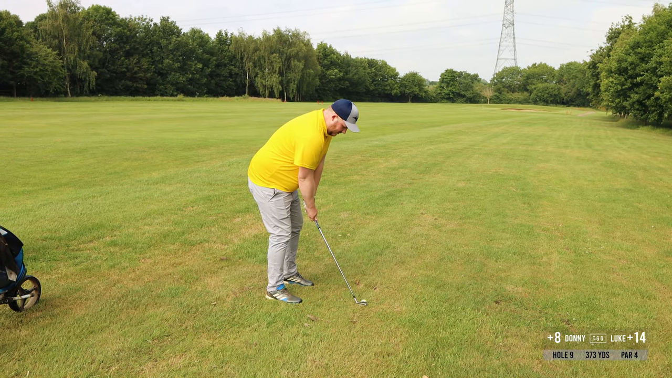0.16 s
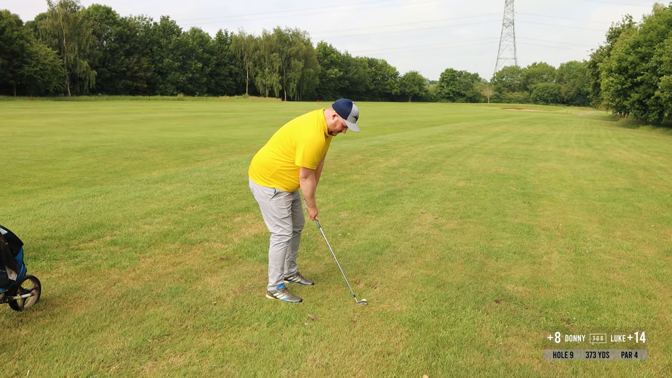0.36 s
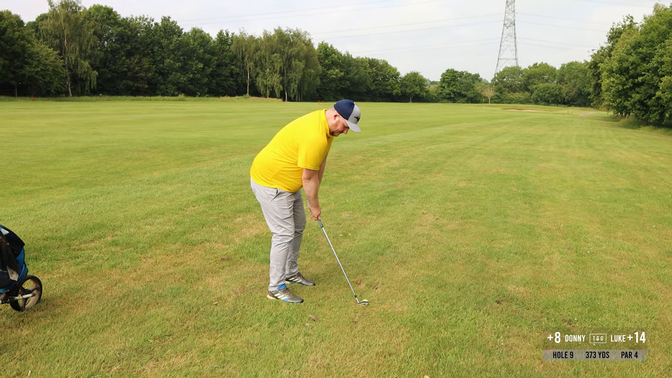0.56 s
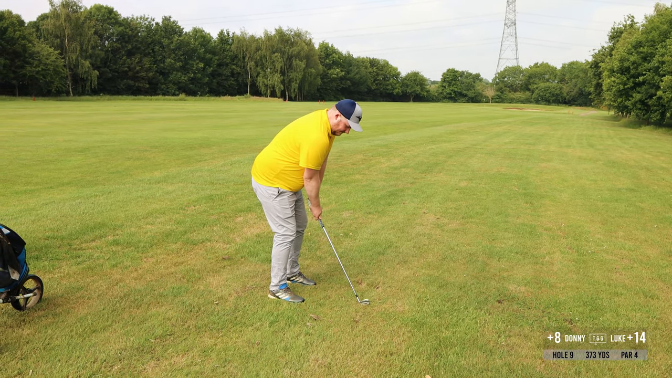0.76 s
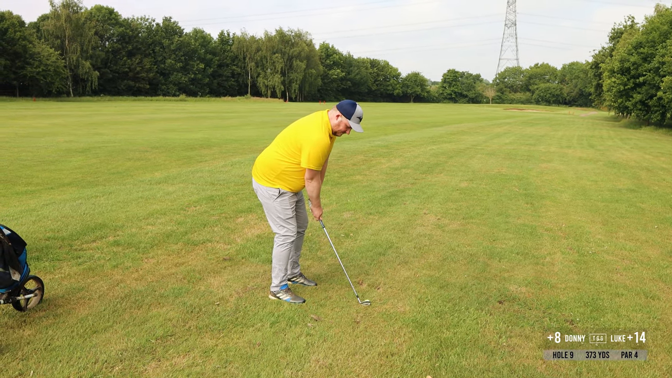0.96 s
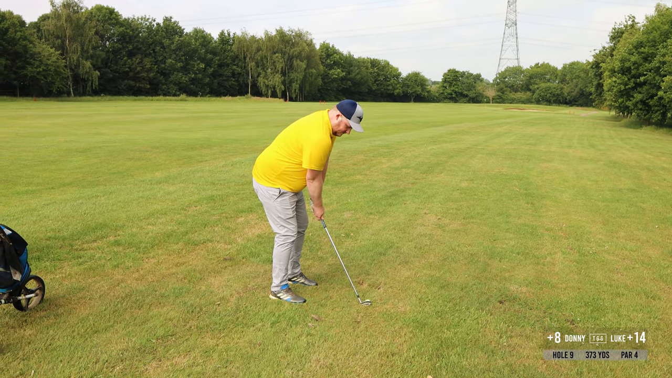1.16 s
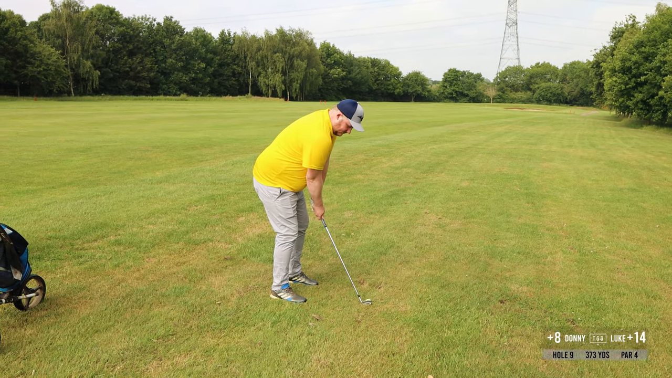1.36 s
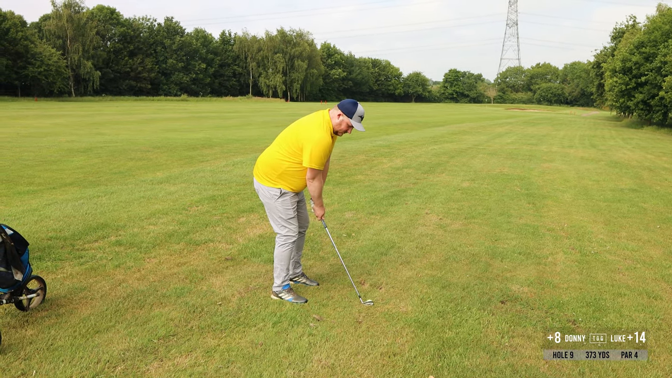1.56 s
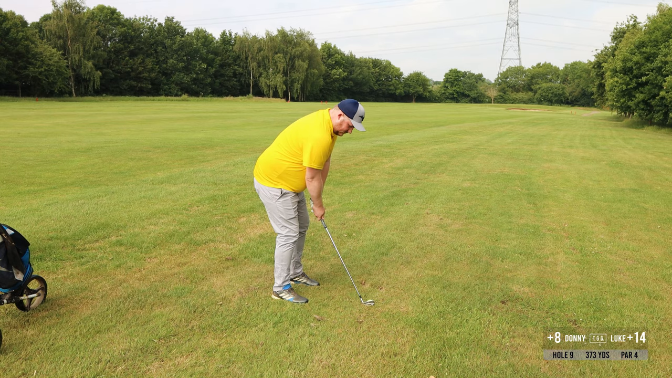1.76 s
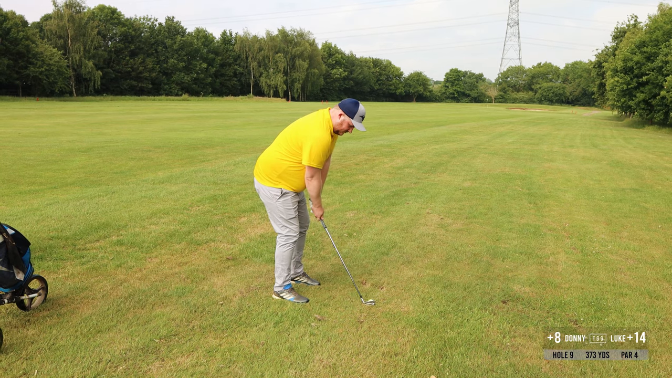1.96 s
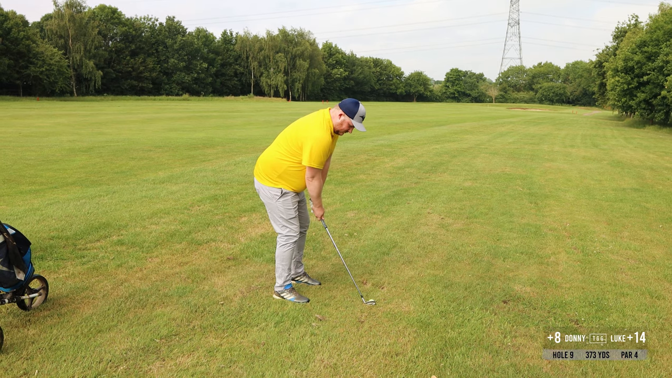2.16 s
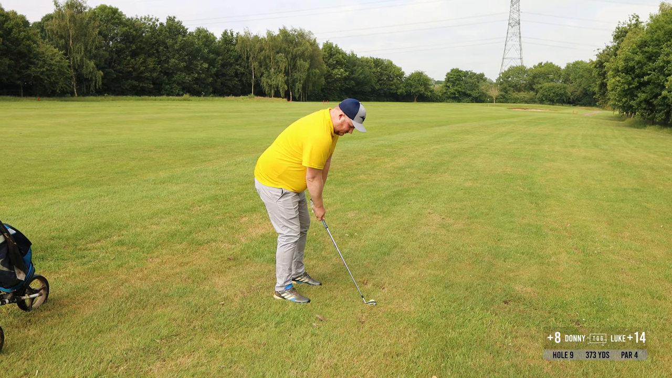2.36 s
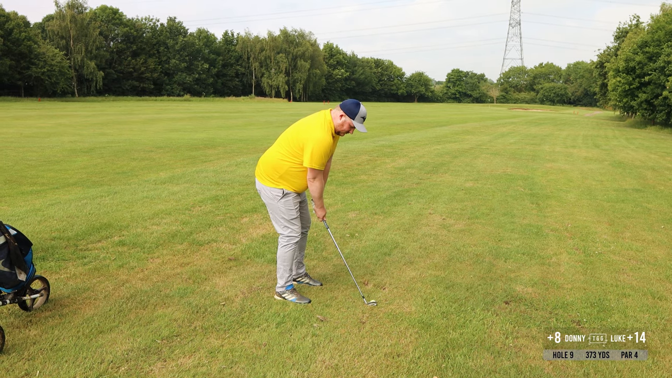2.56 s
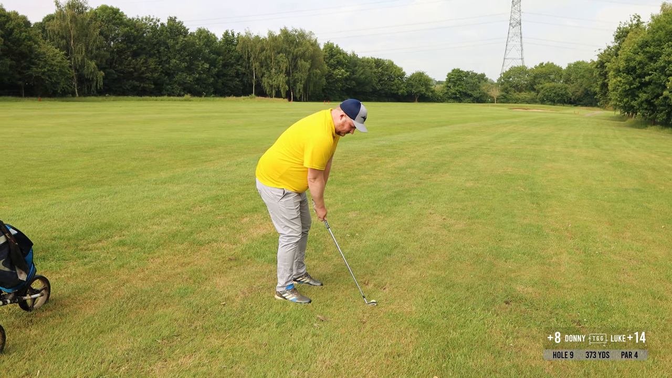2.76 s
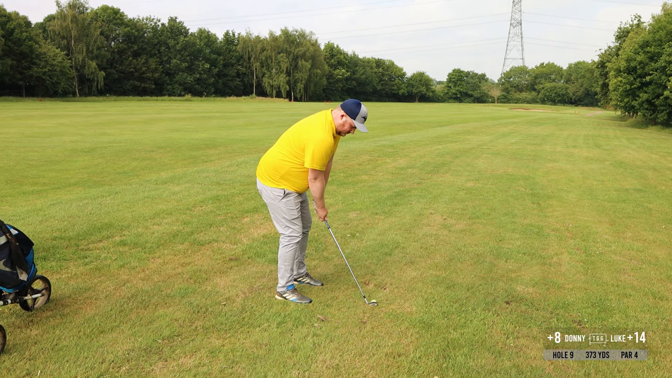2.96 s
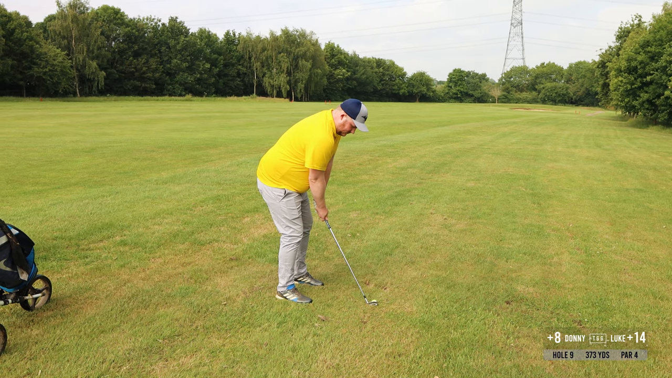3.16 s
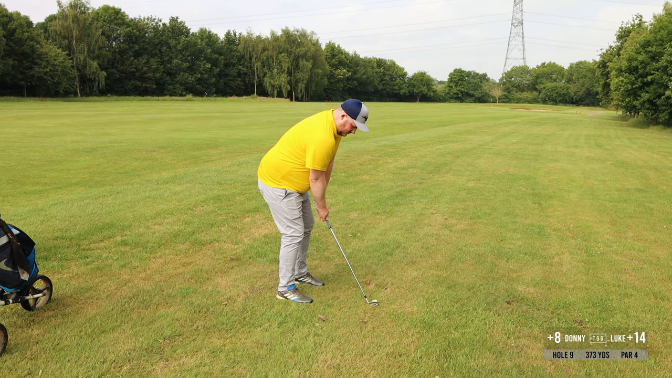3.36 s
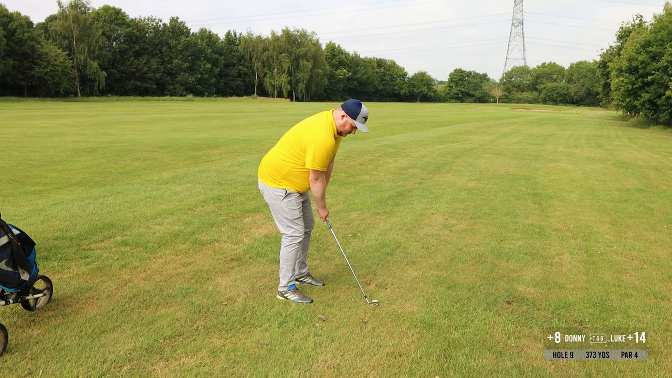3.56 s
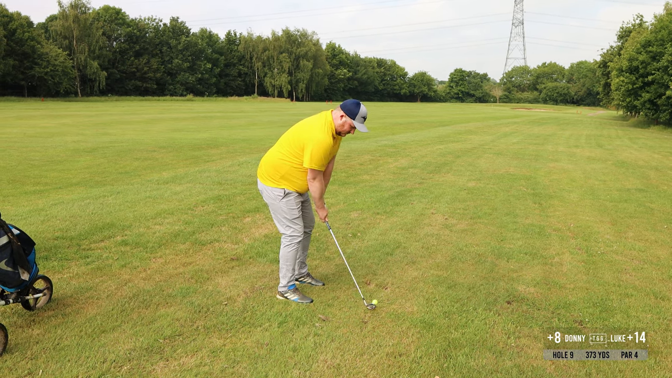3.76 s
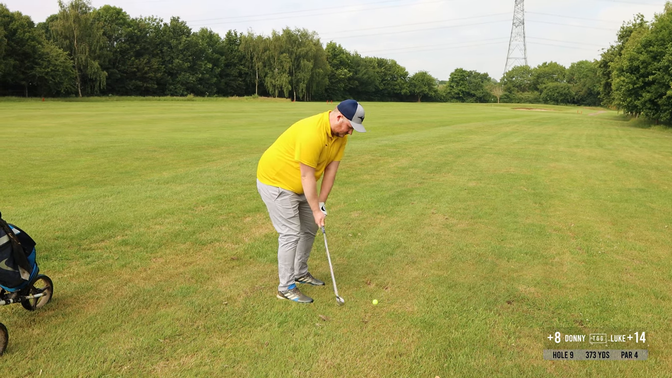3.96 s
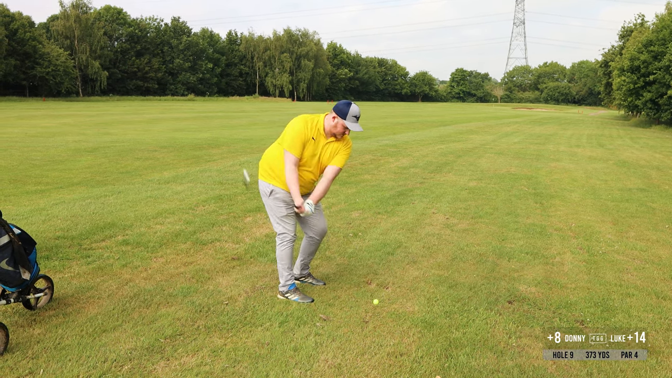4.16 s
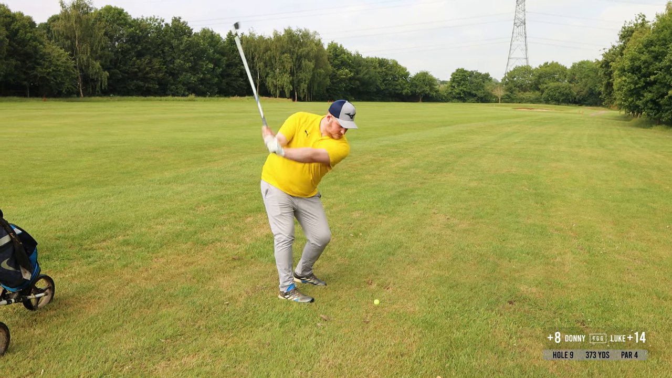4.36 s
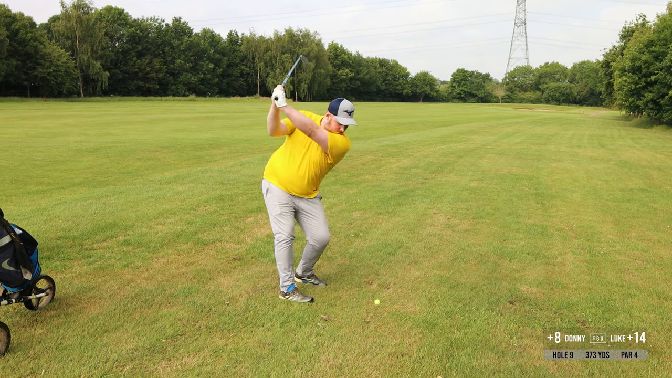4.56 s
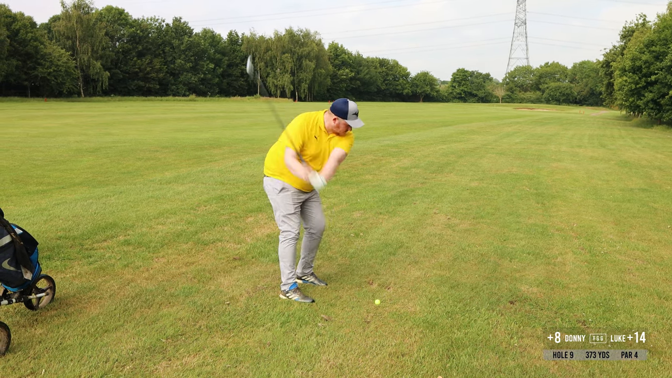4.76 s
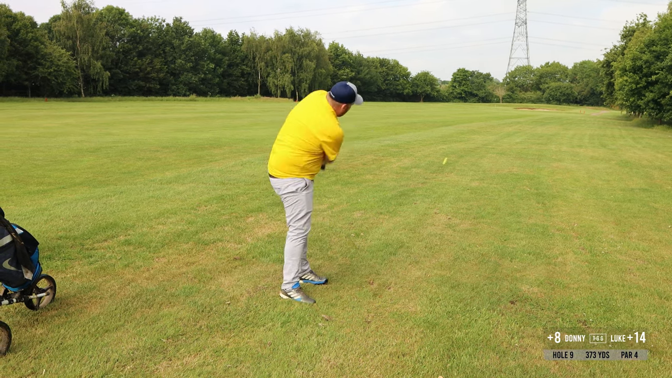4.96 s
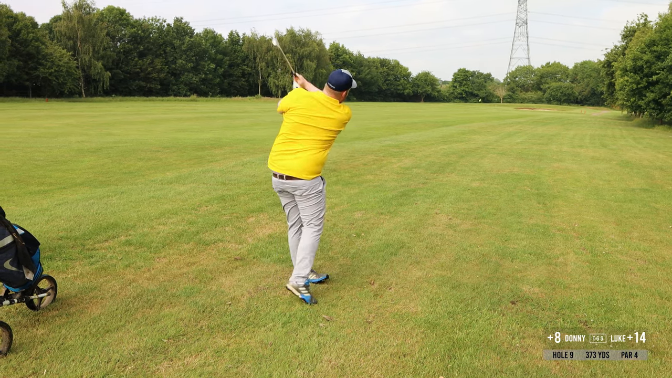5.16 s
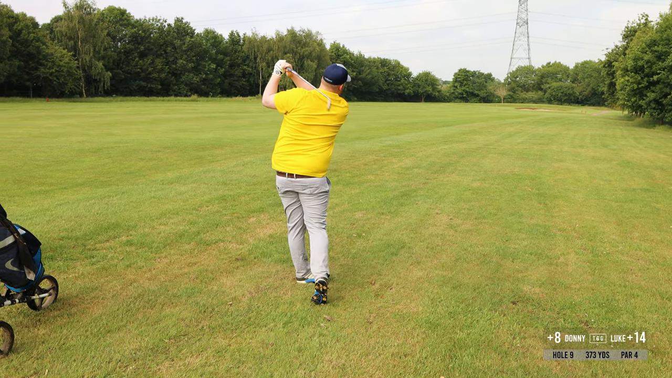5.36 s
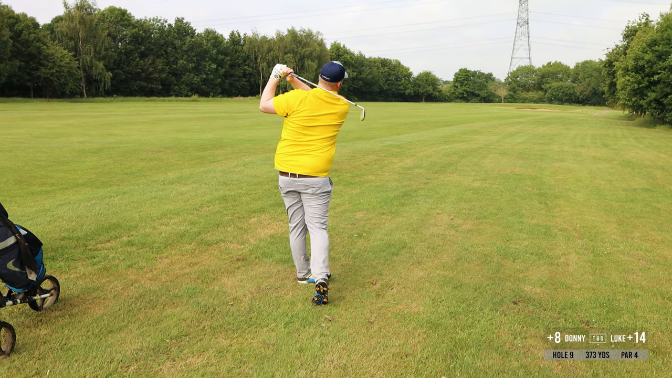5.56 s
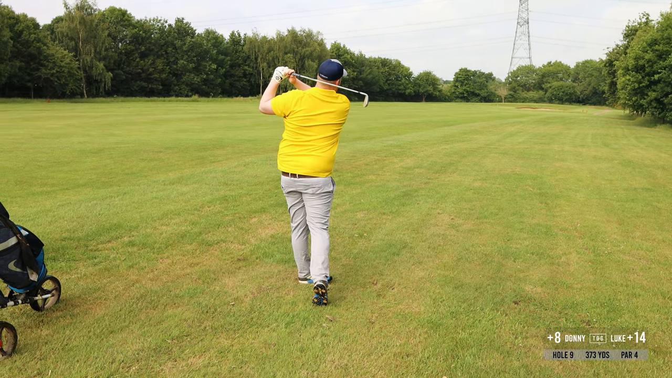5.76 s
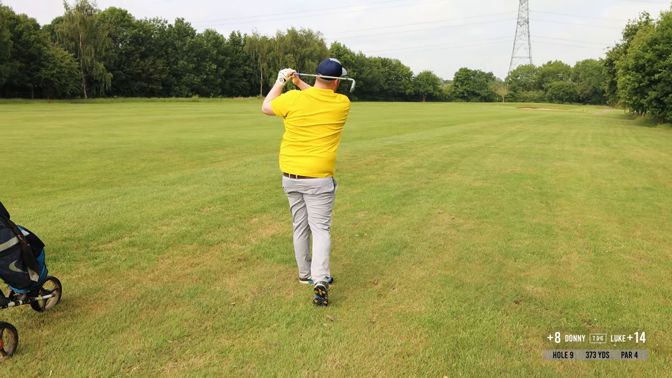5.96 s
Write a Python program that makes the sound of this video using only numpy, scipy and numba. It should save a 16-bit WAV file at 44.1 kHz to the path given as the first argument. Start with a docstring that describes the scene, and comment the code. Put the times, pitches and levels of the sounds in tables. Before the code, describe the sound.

Small birds chirp faintly in a light breeze until a quick swish and a sharp golf strike, with soil pattering down afterwards.

```python
"""A golf iron cracks against a ball on a quiet fairway, a few metres away: ball and club head ring.
Just before, clothes rustle in the backswing and the shaft whooshes down, shedding swirls of air.
The club rips the turf, bits of soil patter down and the tree line answers with a faint echo.
Small birds whistle and chirp over distant traffic and a light breeze."""
import sys
import numpy as np
from scipy import signal
from scipy.fft import rfft, irfft, next_fast_len
from scipy.io import wavfile
from scipy.ndimage import uniform_filter1d
from numba import njit

SR = 44100
rng = np.random.default_rng(int(sys.argv[2]) if len(sys.argv) > 2 else 0)


def unload_audio(sound):
    """Save the sound as a 16-bit wav file, at the path given as the first command line argument."""
    columns = np.transpose(np.atleast_2d(sound))
    # keep every value between -1 and 1, then stretch to whole-number steps
    steps = np.round(np.clip(columns, -1, 1) * 32767)
    wavfile.write(sys.argv[1], SR, steps.astype(np.int16))


N = 265305
T = np.arange(N) / SR
STRIKE_S = 4.9937  # the club meets the ball

# tone of distant traffic and leaves (f/Hz, level/dB)
TRAFFIC_COLOUR = [(20, -0.5), (50, -2.5), (105, -1), (160, -4), (220, -8), (450, -9), (850, -9),
                  (1300, -14.5), (2100, -18.5), (3500, -19.5), (5000, -21), (8500, -23.5), (10500, -25.5),
                  (15500, -27)]
# low rumble of wind on the microphone (f/Hz, level/dB)
BREEZE_COLOUR = [(15, -5.5), (50, 3), (90, -6), (180, -23), (600, -44), (4000, -80)]
# gusts of wind (peak t/s, rise/s, fall/s, level/dB)
WIND_GUSTS = [(4.29, .4, 0.47, -62), (5.33, .15, 0.59, -70.5)]
# thin whistles from the trees (t/s, length/s, f/Hz, glide/octaves, level/dB)
FAR_WHISTLES = [(1.102, 0.075, 3300, 0.206, -77), (1.27, .08, 3280, .24, -74),
                (1.701, .1, 3000, -.19, -75.5), (2.155, 0.077, 5070, .03, -73.5),
                (2.251, 0.076, 4920, 0.054, -70), (2.351, .085, 4730, 0.042, -67.5),
                (2.476, 0.083, 4790, -0.055, -69.5), (2.575, 0.075, 3470, -.05, -76),
                (2.62, .19, 7870, -0.087, -78), (2.745, .08, 4800, 0.0022, -78),
                (5.598, .065, 1770, 0.21, -70), (5.68, 0.06, 2660, 0.05, -71),
                (5.749, 0.21, 2580, -0.038, -72), (5.833, .08, 3240, 0, -75),
                (5.925, 0.051, 2170, -0.041, -72)]
# buzzy chirps from the trees (t/s, length/s, f/Hz, glide/octaves, level/dB, buzz/share of pitch)
FAR_CHIRPS = [(0, 0.079, 1760, 0.0053, -68.5, 0.22), (1.975, .07, 3360, -0.46, -73, .1),
              (3.46, .1, 8430, -0.041, -77, .025), (3.56, .084, 3430, -0.23, -72, .07),
              (4.3, .18, 8420, .03, -75, .04)]
# two slurred calls of a nearby bird, a list for each (t/s, f/Hz, level/dB, buzz/share of pitch)
BIRD_CALLS = [
    [(.033, 5200, -70, .08), (.058, 5050, -63.5, .09), (.074, 3600, -59.5, .01), (.091, 3250, -68, .01),
     (.109, 2150, -66, .01), (.119, 3900, -63, .01), (.134, 2950, -61, .01), (.148, 3150, -74, .01)],
    [(.21, 5400, -74, 0.086), (.242, 3050, -68, 0.15), (.274, 1980, -64.5, .03), (.309, 3750, -60.5, .005),
     (.329, 3900, -63, .09), (.348, 2700, -65.5, .12), (.4, 2330, -70.5, 0.11), (.49, 2130, -75, .12)],
]
# tone of the echo from grass and leaves (f/Hz, level/dB)
TREE_COLOUR = [(100, -11), (400, -5), (1000, -1.5), (2000, -6), (4500, 1.5), (7000, -1.5), (8700, 0.5),
               (9800, -0.5), (15000, -3)]
# tone of rustling cloth (f/Hz, level/dB)
RUSTLE_COLOUR = [(100, -12), (500, -2), (1200, -0.5), (3000, -3), (6000, -14), (8500, -8), (10000, -21),
                 (15000, -22)]
# the golfer draws the club away, swings back, turns through (peak t/s, rise/s, fall/s, level/dB)
BODY_MOVES = [(3.82, 0.037, .07, -73.5), (4.31, 0.18, 0.37, -68), (5.15, 0.33, .9, -64)]
# soft blows on the ground: the club's underside, then clods (t/s, level/dB, f/Hz, 60 dB fade/s)
SOIL_THUDS = [(4.9914, -27.5, 730, 0.01), (4.9927, -16.5, 834, 0.014), (4.998, -40, 335, 0.065),
              (5.3033, -34.5, 580, 0.0087), (5.3075, -39.5, 800, 0.0081), (5.3125, -40, 1180, 0.006),
              (5.41, -39.5, 1370, 0.0055), (5.4127, -41.5, 1490, 0.0047), (5.439, -48, 650, .008),
              (5.4435, -45, 1700, .004)]
# sharp little ticks of grit (t/s, level/dB)
GRIT_TICKS = [(5.2958, -40.5), (5.308, -35), (5.437, -44), (5.4433, -48), (5.5415, -53)]
# the tones in one tick (f/Hz, level/dB, 60 dB fade/s)
GRIT_MODES = [(4300, -10, 0.0014), (6050, -3, 0.0019), (8150, -1.5, 0.0031), (11600, -8, .0015)]
# small bits of soil give off little bass (f/Hz, level/dB)
SOIL_COLOUR = [(60, -10), (200, -2), (400, 0.5), (15000, -1.5)]
# tone of tearing turf (f/Hz, level/dB)
RIP_COLOUR = [(50, -10), (180, 2.5), (350, -2.5), (900, -8), (1600, 0.5), (3000, -7), (5000, -9),
              (8600, -6.5), (10000, -15.5), (15000, -13)]
# hiss of air around the club head (f/Hz, level/dB)
HEAD_COLOUR = [(120, -8), (250, -0.5), (700, -5), (1400, -2), (2800, -3.5), (5000, -9.5), (8500, -13.5),
               (10000, -21), (15000, -26)]
# the whoosh dips as the club swings away, surges as it comes round
# (t/s after the strike, half width/s, level/dB)
WHOOSH_TURNS = [(0.028, 0.017, -16), (.062, 0.018, 6.5)]
# the tones of ball and club head ringing together (f/Hz, level/dB, 60 dB fade/s)
STRIKE_MODES = [(730, -13, 0.013), (790, -8, 0.017), (1290, 9, 0.0035), (1336, -8.5, 0.015),
                (1497, -1.5, 0.013), (1730, -10, 0.016), (1867, -13, 0.024), (2207, -10.5, 0.025),
                (2680, -10.5, 0.02), (3200, -15.5, 0.023), (3640, -21, 0.029), (4330, -24, .02),
                (4620, -16.5, 0.02), (5620, -11.5, 0.012), (7470, -28, .02), (7970, -24, 0.046),
                (8620, -27, 0.058), (11160, -27, 0.0089)]


def undb(db):
    """Turn decibels into a gain to multiply by."""
    return 10 ** (np.asarray(db) / 20)


def curve(rows):
    """Join each column of a table by straight lines in time."""
    times, *columns = np.transpose(rows)
    return [np.interp(T, times, column) for column in columns]


def unit(x):
    """Scale to an average strength (rms) of 1."""
    return x / np.sqrt(np.mean(x ** 2))


def colour(x, points):
    """Shape the bass and treble along (f/Hz, level/dB) points."""
    hz, db = np.transpose(points)
    size = next_fast_len(N + 4096)
    f = np.maximum(np.arange(size // 2 + 1) * SR / size, 1)
    gain = undb(np.interp(np.log(f), np.log(hz), db))
    return irfft(rfft(x, size) * gain, size)[:N]


def noise(points, grain_db=0):
    """Shaped noise of strength 1; grain makes it crackle."""
    return unit(colour(rng.standard_normal(N) * undb(grain_db * rng.exponential(size=N)), points))


def wander(rate_hz):
    """A smooth random drift, roughly between -1 and 1."""
    hold = int(SR / rate_hz)
    steps = np.repeat(rng.standard_normal(N // hold + 1), hold)
    return 1.3 * uniform_filter1d(uniform_filter1d(steps, hold), hold)[:N]


def fade(t, t60):
    """Die away by 60 dB every t60 seconds."""
    return np.exp(-np.log(1000) * t / t60)


def swells(rows):
    """A gain that grows to each peak and dies away; overlapping swells add their power."""
    power = sum((undb(db) * np.exp(-np.maximum((s - T) / rise, (T - s) / fall))) ** 2
                for s, rise, fall, db in rows)
    return np.sqrt(power)


def ring(modes):
    """A struck object rings with a few fading tones, its modes."""
    t = T[:SR // 4]
    return sum(undb(db) * np.sin(2 * np.pi * hz * t) * fade(t, t60) for hz, db, t60 in modes)


def add(out, s, x):
    """Mix a short sound in at s seconds."""
    start = int(round(s * SR))
    out[start:start + len(x)] += x[:N - start]


def traffic(level_db=-63, drift_db=0.5):
    """Distant traffic and leaves blend into a nearly steady hush."""
    return noise(TRAFFIC_COLOUR) * undb(level_db + drift_db * wander(2.9))


def breeze(calm_db=-79, flutter_db=2):
    """Light wind rumbles on the microphone and rises in gusts."""
    strength = np.hypot(undb(calm_db), swells(WIND_GUSTS)) * undb(flutter_db * wander(8.2))
    return noise(BREEZE_COLOUR) * strength


def bird_voice(hz, buzz, buzz_hz=210, waver=0.0045, unsteady=0.15):
    """A bird's whistle; a fast flutter of the pitch makes it buzz."""
    flutter_hz = buzz_hz * (1 + unsteady * wander(90)[:len(hz)])
    flutter = np.sin(2 * np.pi * np.cumsum(flutter_hz) / SR)
    pitch = hz * (1 + buzz * flutter + waver * wander(120)[:len(hz)])
    return np.sqrt(2) * np.sin(2 * np.pi * np.cumsum(pitch) / SR)


def bird_note(length, hz, glide, db, buzz=0, arch=0.008):
    """One short note swells and fades while its pitch glides along a slight arch."""
    progress = np.linspace(0, 1, int(length * SR))
    swell = np.sin(np.pi * progress)
    octaves = glide * (progress - 0.5) + arch * (swell - 1)
    return undb(db) * swell * bird_voice(hz * 2 ** octaves, buzz)


def far_birds():
    """Small birds whistle and chirp along the tree line."""
    out = np.zeros(N)
    for s, *shape in FAR_WHISTLES + FAR_CHIRPS:
        add(out, s, bird_note(*shape))
    return out


def near_bird(break_hz=2100, break_range_hz=500):
    """Each call swoops down and up, buzzy at first; the clear voice breaks off at the bottom."""
    out = np.zeros(N)
    for call in BIRD_CALLS:
        hz, db, buzz = curve(call)
        voiced = np.clip((hz - break_hz) / break_range_hz + buzz / buzz.max(), 0, 1)
        calling = (T > call[0][0]) * (T < call[-1][0])
        voice = bird_voice(hz, buzz, buzz_hz=215, waver=0.0098, unsteady=0.3)
        out += voice * voiced * undb(db) * calling
    return out


def tree_echo(x, level_db, t60, delay_s):
    """Grass and leaves scatter a sound back as a thin, late tail."""
    tail = noise(TREE_COLOUR) * fade(T, t60) * np.clip(T / delay_s - 1, 0, 1)
    tail /= np.sqrt(np.sum(tail ** 2))
    return undb(level_db) * signal.fftconvolve(x, tail)[:N]


def clothes(flutter_db=1):
    """Shirt and trousers rustle as the golfer moves."""
    return noise(RUSTLE_COLOUR, grain_db=2) * swells(BODY_MOVES) * undb(flutter_db * wander(22))


def soil():
    """The club and falling clods thud on the ground, and grit ticks brightly."""
    out = np.zeros(N)
    for s, db, hz, t60 in SOIL_THUDS:
        add(out, s, -ring([(hz, db, t60)]))
    for s, db in GRIT_TICKS:
        add(out, s, undb(db) * ring(GRIT_MODES))
    return colour(out, SOIL_COLOUR)


def turf_rip(level_db=-28.5, lead_s=0.0023, drag_s=0.016, sag_db_per_s=560, release_t60=0.015):
    """Grass and roots snap: the club digs in just before the ball, drags and slows, then comes free."""
    t = T - STRIKE_S
    dig = np.clip(1 + t / lead_s, 0, 1) ** 2
    drag = undb(level_db - sag_db_per_s * np.clip(t, 0, drag_s))
    release = fade(np.maximum(t - drag_s, 0), release_t60)
    return noise(RIP_COLOUR, grain_db=2) * dig * drag * release


def club_speed(t, downswing_s=0.17, speed_kept=0.9, follow_through_s=0.22):
    """Share of top speed: the club speeds up until t = 0, loses a little in the turf, then slows."""
    speed = np.where(t < 0, 1 + t / downswing_s, speed_kept * (1 - t / follow_through_s))
    return np.clip(speed, 0, 1)


@njit
def bandpass(x, hz, width):
    """Keep the sound near a moving pitch; the width is a share of that pitch."""
    out, band_state, low_state = np.empty(len(x)), 0., 0.
    for i in range(len(x)):
        tuning = np.tan(np.pi * hz[i] / SR)
        band = (band_state + tuning * (x[i] - low_state)) / (1 + tuning * (tuning + width))
        band_state = 2 * band - band_state
        low_state += 2 * tuning * band
        out[i] = width * band
    return out


def whoosh(top_hz=700, width=0.86, shaft_db=-41, head_db=-38, hidden_db=-16, hide_s=0.057):
    """The shaft sheds swirls of air at a pitch that follows its speed; the head adds a hiss."""
    t = T - STRIKE_S
    speed = club_speed(t)
    hz = top_hz * np.maximum(speed, 0.25)
    band = bandpass(rng.standard_normal(N), hz, width)
    swirls = unit(bandpass(band, hz, width) / np.sqrt(hz))
    singing = np.clip((speed - 0.41) / 0.22, 0, 1) ** 2  # the shaft sings only above 41% of top speed
    shadow_db = hidden_db * np.clip(t / hide_s, 0, 1)  # the body hides it once the ball has gone
    shaft = swirls * singing * speed ** 1.84 * undb(shaft_db + shadow_db)
    head = noise(HEAD_COLOUR) * speed ** 4.4 * undb(head_db)
    turn_db = sum(db * np.exp(-((t - s) / half_width) ** 2) for s, half_width, db in WHOOSH_TURNS)
    return (shaft + head) * undb(turn_db)


def strike(snap_db=5, snap_hz=6200, snap_t60=0.00055, squeeze_s=0.00008, ring_db=-11.5):
    """Contact makes a tiny snap; the ball squeezes and springs back, then ball and club head ring."""
    out = np.zeros(N)
    add(out, STRIKE_S - squeeze_s, -ring([(snap_hz, snap_db, snap_t60)]))
    add(out, STRIKE_S, undb(ring_db) * ring(STRIKE_MODES))
    return out


def scene():
    """Everything reaches one microphone, so both ears hear the same."""
    shot = whoosh() + strike() + turf_rip() + soil()
    far_song = far_birds()
    echoes = tree_echo(shot, level_db=-30, t60=1.55, delay_s=0.026)
    echoes += tree_echo(far_song, level_db=-7.5, t60=1.7, delay_s=0.024)
    mono = shot + near_bird() + far_song + echoes + traffic() + breeze() + clothes()
    return np.array([mono, mono])


def record(dry, ceiling_db=-10, hiss_db=-77, top_hz=15800):
    """The crack briefly overloads the input; each channel hisses faintly; the highest treble is cut."""
    clipped = np.clip(dry, -undb(ceiling_db), undb(ceiling_db))
    hiss = undb(hiss_db) * rng.standard_normal(dry.shape)
    treble_cut = signal.ellip(10, 0.2, 70, top_hz, fs=SR, output="sos")
    return signal.sosfilt(treble_cut, clipped + hiss)


dry = scene()
out = record(dry)
unload_audio(out)
```